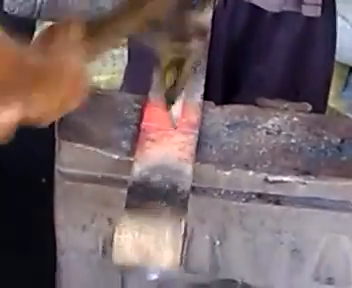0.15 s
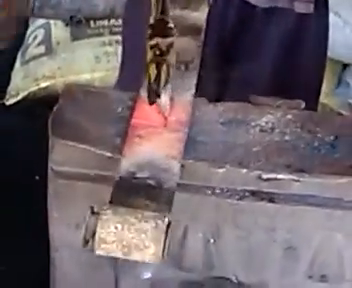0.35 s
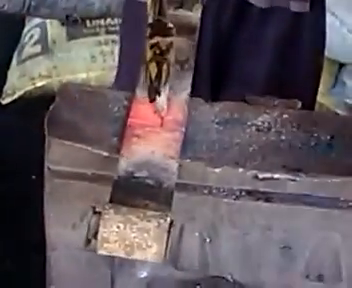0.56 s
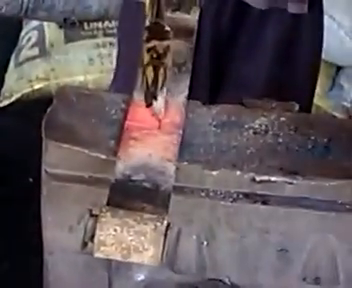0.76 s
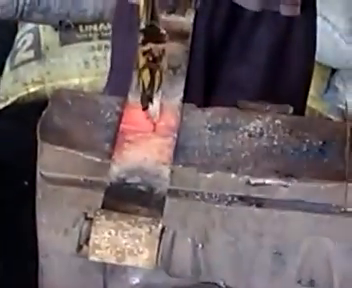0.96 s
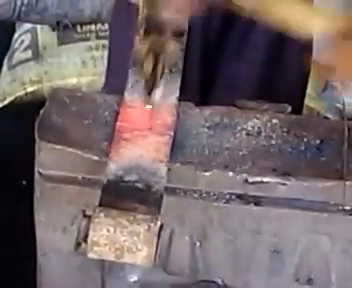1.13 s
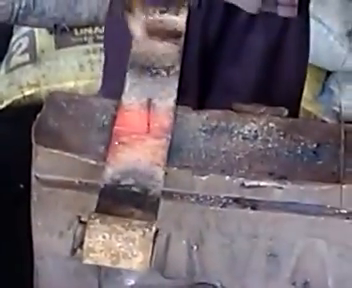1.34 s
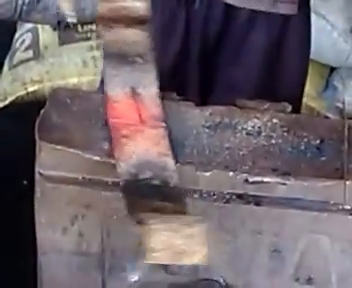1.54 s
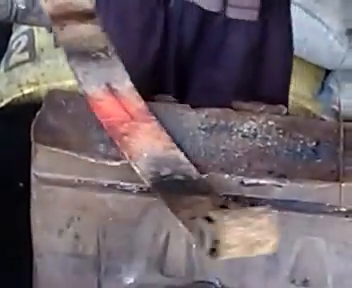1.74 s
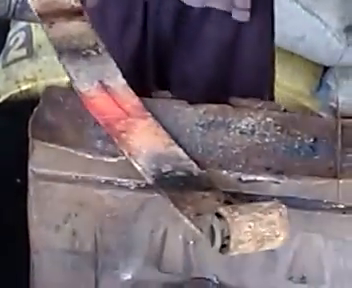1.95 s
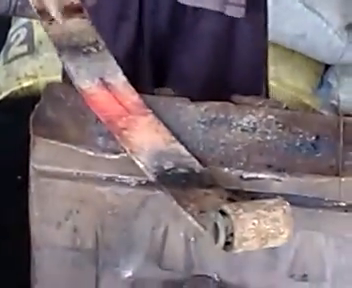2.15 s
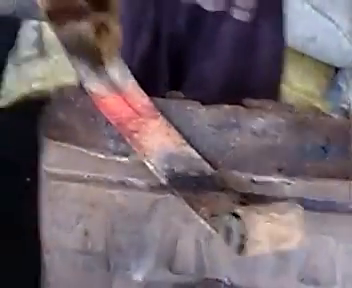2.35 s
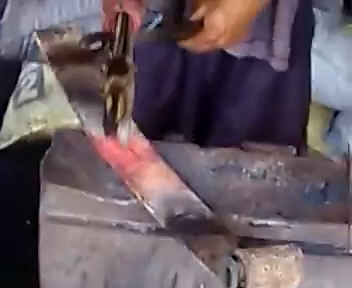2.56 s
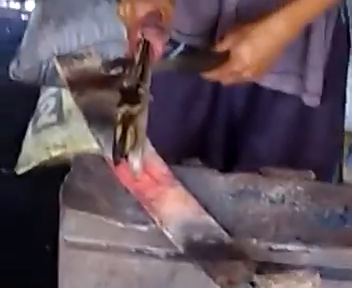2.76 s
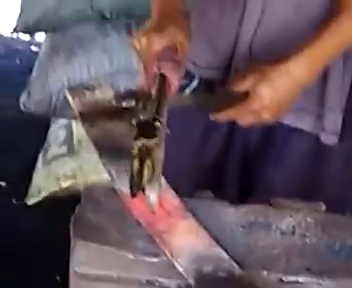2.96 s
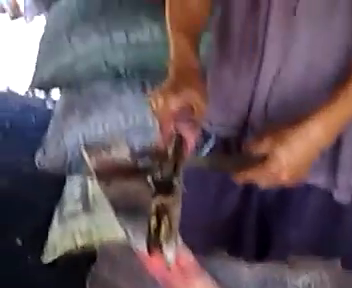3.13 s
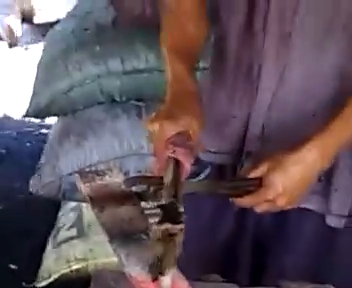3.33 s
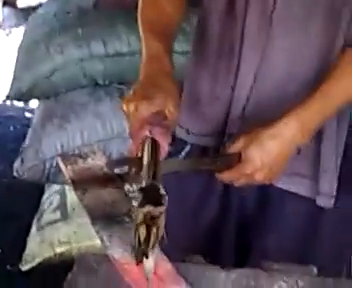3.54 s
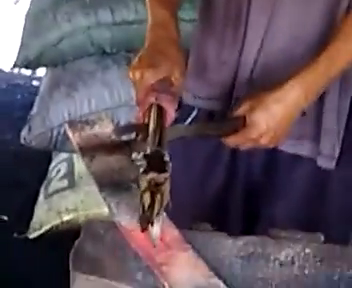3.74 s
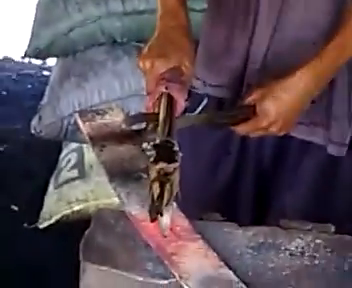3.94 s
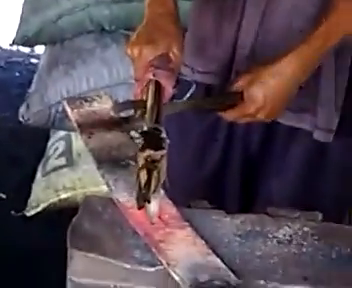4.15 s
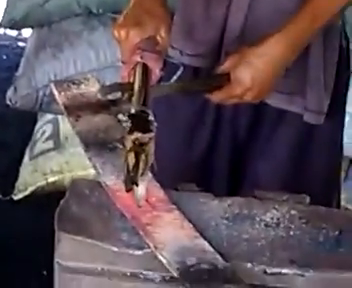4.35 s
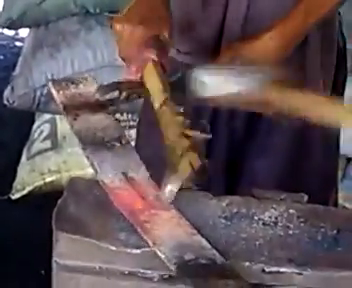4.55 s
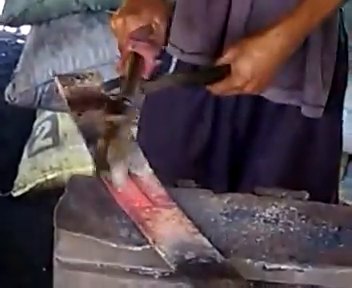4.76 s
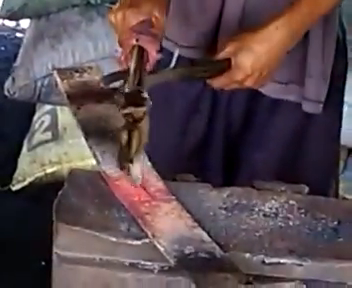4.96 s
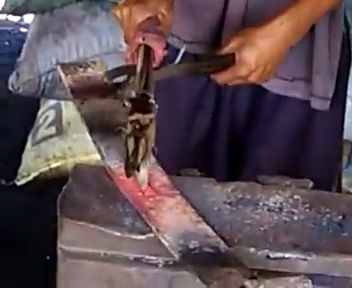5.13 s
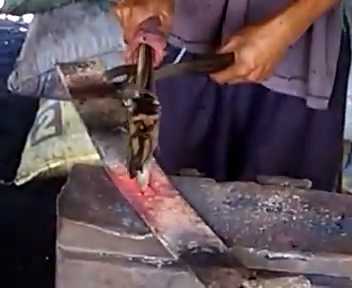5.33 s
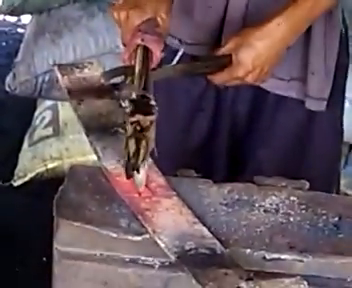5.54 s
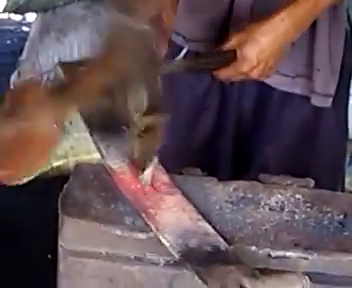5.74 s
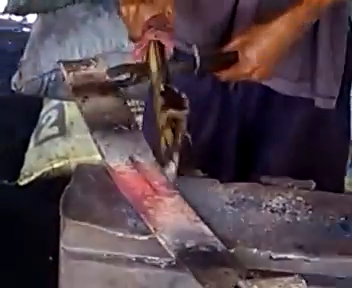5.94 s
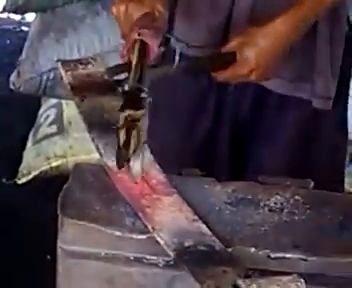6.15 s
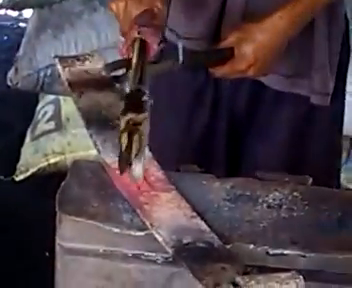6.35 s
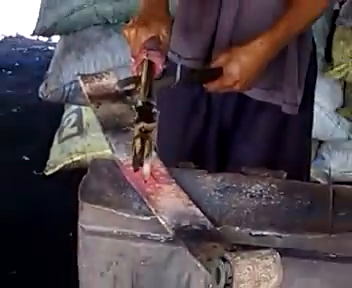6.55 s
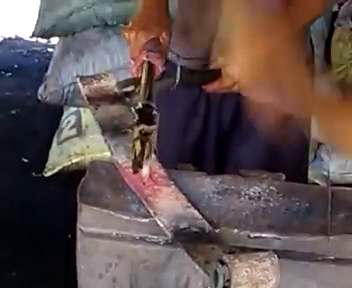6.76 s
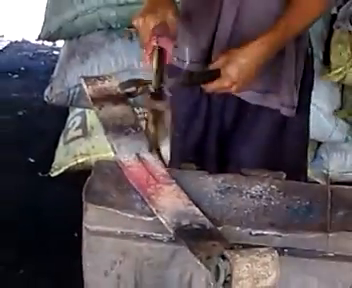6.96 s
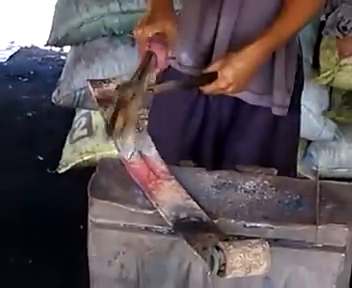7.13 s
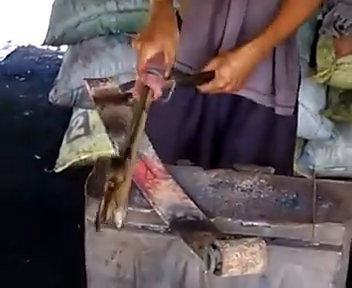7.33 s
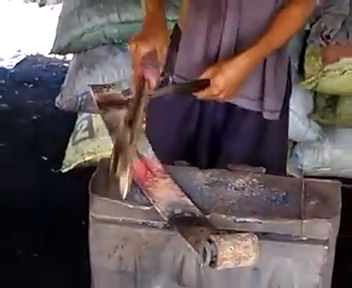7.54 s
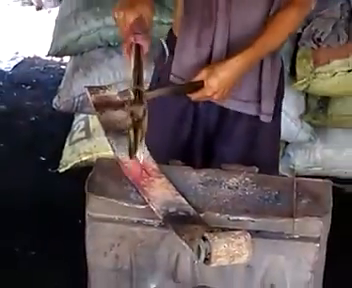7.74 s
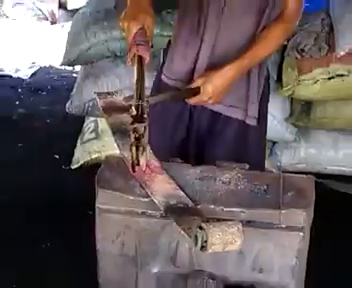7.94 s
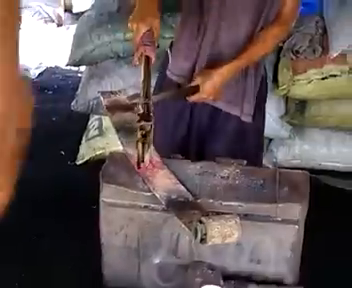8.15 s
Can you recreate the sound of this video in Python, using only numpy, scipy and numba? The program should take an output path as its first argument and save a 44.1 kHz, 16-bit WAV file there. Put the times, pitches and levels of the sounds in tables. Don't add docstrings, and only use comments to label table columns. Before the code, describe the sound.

Sparse hammer strikes clang through a chisel on an anvil, with scrapes and ticks between, over road rumble and engine drone, dull overloaded phone sound.

```python
import sys
import numpy as np
from scipy import signal
from scipy.io import wavfile
from scipy.ndimage import uniform_filter1d
from numba import njit

SR = 44100
rng = np.random.default_rng(int(sys.argv[2]) if len(sys.argv) > 2 else 0)


def to_linear_factor(level_db):
    exponent = np.asarray(level_db, float) / 20
    return 10 ** exponent


def store_pcm(level_fs):
    pcm = np.round(np.clip(level_fs, -1, 1) * 32767).astype(np.int16)
    wavfile.write(sys.argv[1], SR, np.atleast_2d(pcm).T)


N = 365809
T = np.arange(N) / SR


@njit
def svf(x, hz, width):
    y, band, low = np.empty(len(x)), 0., 0.
    g, damping = np.tan(np.pi * hz / SR), width / hz
    for i in range(len(x)):
        v = (band + g * (x[i] - low)) / (1 + g * (g + damping))
        band, low, y[i] = 2 * v - band, low + 2 * g * v, damping * v
    return y


def svf_twice(x, hz, width):
    return svf(svf(x, hz, width), hz, width)


def unit(x):
    return x / np.sqrt(np.mean(x ** 2))


def walk(rate, count=N):
    hold = int(SR / rate)
    steps = np.repeat(rng.standard_normal(count // hold + 1), hold)
    return 1.3 * uniform_filter1d(uniform_filter1d(steps, hold), hold)[:count]


def add(out, s, x):
    i = int(s * SR)
    out[i:i + len(x)] += x[:len(out) - i]


def fade(t, t60):
    return to_linear_factor(-60 * t / t60)


def low_pass(x, hz, order=8):
    return signal.sosfiltfilt(signal.cheby2(order, 45, hz, fs=SR, output="sos"), x)


def road():
    # frequency_hz, density_db (per Hz)
    colour = [(25, -1.5), (105, -9.5), (146, -2), (384, -7.5), (722, -5.5), (2660, -12.5), (3600, -24),
              (4940, -64)]
    # centre_s, half_length_s, level_db
    passes = [
        (.55, .2, 2.5),
        (1.284, 0.28, 2),
        (3.19, 0.44, -1.1),
        (8.2, 0.26, 1.5),
    ]
    steady_db, rumble_db = -44.5, -1
    hz, density_db = np.transpose(colour)
    bands = []
    for centre in 28 * 2 ** np.arange(0, 7.2, 1 / 3):
        band_db = np.interp(np.log(centre), np.log(hz), density_db) + 1.8 * walk(9)
        bands.append(to_linear_factor(band_db) * svf_twice(rng.standard_normal(N), centre, centre / 3))
    low, high = sum(bands[:11]), sum(bands[11:])
    swell_db = sum(db * np.exp(-((T - s) / half) ** 2) for s, half, db in passes)
    return (high + low * to_linear_factor(rumble_db)) / np.std(high) * to_linear_factor(steady_db + 2.5 + swell_db)


def engine(curve, orders, wobble, flutter_db, knee):
    s, hz, db, upper_db = np.transpose(curve)
    phase = 2 * np.pi * np.cumsum(np.interp(T, s, hz) * (1 + wobble * walk(6))) / SR
    throttle_db = np.interp(T, s, upper_db)
    tones = np.zeros(N)
    for k, order_db in orders:
        level_db = order_db + flutter_db * walk(6.4) + throttle_db * (k > knee)
        tones += to_linear_factor(level_db) * np.sin(k * phase)
    fade_in = np.clip((T - s[0] + 0.27) / 0.34, 0, 1)
    fade_out = np.clip((s[-1] + 0.25 - T) / 0.48, 0, 1)
    return np.sqrt(2) * tones * to_linear_factor(np.interp(T, s, db)) * fade_in * fade_out


def leaving_engine():
    # time_s, firing_hz, level_db, upper_multiples_db
    curve = [(0, 49.64, -49.5, -3), (.31, 48.97, -48.5, 2), (.7, 46.95, -46.5, 5.5), (.97, 47.36, -40, -17),
             (1.3, 45.4, -44.5, -3.5), (1.84, 44.8, -51, 2), (2.3, 45.36, -50.5, 1), (3.1, 44.95, -60, 2),
             (4.1, 45.1, -67, -8)]
    # multiple, level_db
    orders = [(1, -10), (2, -1.5), (3, -6), (4, -4.5), (5, -8), (6, -13.5), (7, -6), (8, -13), (9, -14.5),
              (10, -14.5), (11, -11)]
    return engine(curve, orders, wobble=.004, flutter_db=1.3, knee=2.5)


def idling_engine():
    # time_s, firing_hz, level_db, upper_multiples_db
    curve = [(2.2, 29.45, -62, 3), (3.06, 30.02, -54.5, -6.5), (4.03, 31.07, -56.5, 3),
             (5.1, 31.7, -55.5, 0), (6, 32.06, -54, 9.5), (6.6, 32.65, -52, 1), (7.2, 32.8, -49, 1.5),
             (7.88, 32.8, -48.5, 3), (8.29, 33.86, -52, 3)]
    # multiple, level_db
    orders = [(2, -3.5), (3, -7), (4, -4.5), (5, 2), (6, -3.5), (8, -8), (11, -15.5), (12, -11.5)]
    return engine(curve, orders, wobble=.003, flutter_db=1.0, knee=5.5)


def scrape():
    # start_s, length_s, level_db
    drags = [(0.067, .25, -58.5), (0.745, 0.13, -54.5), (1.04, 0.11, -49.5), (1.757, .17, -52.5),
             (5.124, 0.063, -57), (5.311, 0.071, -51.5), (7.405, 0.09, -49.5), (7.504, 0.04, -40.5)]
    rest_db = -52
    attack_s, release_s = 0.017, 0.035
    grains = to_linear_factor(3.6 * walk(120)) * unit(svf_twice(rng.standard_normal(N), 2350., 1500.))
    strength = to_linear_factor(rest_db)
    for s, length, db in drags:
        onset = np.clip((T - s) / attack_s, 0, 1)
        strength = strength + to_linear_factor(db) * onset * np.exp(-np.maximum(T - s - length, 0) / release_s)
    return grains * strength


def ring(t, low_db, high_db):
    # mode_hz, t60_s
    modes = [(2912, 1.02), (3370, .82)]
    out = 0
    for (hz, t60), db in zip(modes, (low_db, high_db)):
        partner = 0.1 * fade(t, 0.32) * np.sin(2 * np.pi * (hz + 9) * t)
        out = out + to_linear_factor(db) * fade(t, t60) * (np.sin(2 * np.pi * hz * t) + partner)
    return out


def ticks():
    # start_s, peak_db, centre_hz, t60_s, ring_db
    contacts = [(.3975, -16.5, 1960, 0.12, -50.5), (1.3144, -21, 2350, 0.029, -45),
                (4.6984, -8, 2300, 0.033, -41), (5.009, -33, 2130, 0.035, -59),
                (5.2877, -22, 2500, 0.016, -55.5), (5.344, -28.5, 2490, 0.025, -57),
                (5.3826, -35, 2600, 0.035, -57.5), (6.027, -20.5, 2540, 0.04, -46.5),
                (6.9933, -9, 2380, 0.031, -56), (7.048, -21.5, 2800, 0.048, -44),
                (7.5058, -19, 1710, 0.026, -41), (8.0637, -29, 2480, 0.036, -55)]
    out, t = np.zeros(N), T[:SR]
    for s, db, hz, t60, ring_db in contacts:
        noise = rng.standard_normal(SR // 5)
        broad = unit(svf(svf(noise, 2300., 1800.), 2800., 1800.))
        knock = unit(svf(noise, 1. * hz, 500.)) + .9 * broad
        add(out, s - .001, to_linear_factor(db - 10.0) * knock * fade(t[:len(noise)], max(t60, .008)))
        add(out, s, ring(t, ring_db, ring_db - 18.0))
    return out


def resonate(x, peaks):
    return unit(sum(to_linear_factor(db) * svf(x, 1. * hz, 1. * width) for hz, width, db in peaks))


def blows():
    # start_s, blow_db, low_ring_db, high_ring_db
    strikes = [
        (0.3314, -6, -29.5, -32.5),
        (1.295, -2.5, -22.5, -22),
        (4.683, -6, -35.5, -43.5),
        (5.9234, -7, -16.5, -36.5),
        (6.9703, -7.5, -35, -30.5),
    ]
    # mode_hz, width_hz, level_db
    bars = [
        [(1411, 130, -6.5), (1790, 110, -5), (2254, 74, -0.5), (2650, 40, -0.5), (3050, 71, 5),
         (3467, 260, -1.5)],
        [(1830, 150, -11), (1990, 53, -3), (2260, 370, -7), (2930, 17, 4.5), (3600, 29.95, -1.5),
         (3830, 18, -5)],
        [(1770, 64, -2), (1993, 46, -1), (2350, 21, -8), (2355, 88, 4.5), (2712, 42, -8.5), (3266, 62, -15.5)],
        [(1530, 9.8, -12), (2120, 47, -5), (2393, 19, 5), (2800, 106, -7.5), (3000, 20, -12), (3624, 210, -4)],
        [(1870, 41, -19), (2260, 32, -2.5), (2380, 82, -6), (2570, 22, 0.5), (2889, 44, 0), (3800, 57, -16)],
    ]
    # mode_hz, width_hz, level_db
    stump = [(168, 140, -10), (254, 11, -9), (452.7, 94, 5), (762, 170, 0.5), (865, 61, -9)]
    snaps = [3, -1, 2.5, 1, -0.5]
    crack_db, crack_hold_s, crack_t60_s = 4.5, 0.0041, 0.013
    rattle_db, rattle_hold_s, rattle_t60_s = -2.5, .012, 0.16
    thud_db, thud_gain_db = -10.5, 2.5
    ahead_s, ahead_db = 0.028, -24.5
    out, t = np.zeros(N), T[:2 * SR]
    short = t[:SR // 2]
    for k, ((s, db, low_db, high_db), bar, snap_db) in enumerate(zip(strikes, bars, snaps)):
        noise = rng.standard_normal((2, len(short)))
        broad = unit(svf_twice(noise[0], 2900.0, 2800.0))
        steel = resonate(noise[0], bar) + to_linear_factor(-4.5) * broad
        rise = 1 - np.exp(-short / 0.00024)

        crack_decay = fade(np.maximum(short - crack_hold_s, 0), crack_t60_s)
        crack = to_linear_factor(crack_db + snap_db) * crack_decay * (0.48 * steel + 0.79 * broad)

        chatter = to_linear_factor(2.4 * walk(400, count=len(short)))
        rattle_decay = fade(np.maximum(short - rattle_hold_s, 0), rattle_t60_s)
        rattle = to_linear_factor(rattle_db) * steel * (rattle_decay * chatter + to_linear_factor(-23.0) * fade(short, 0.22))

        ground = to_linear_factor(-17) * fade(short, 0.22) * np.sin(2 * np.pi * 52 * short)
        thud = to_linear_factor(thud_db + k * thud_gain_db) * (fade(short, 0.13) * resonate(noise[1], stump) + ground)

        add(out, s - .001, to_linear_factor(db - 6.5) * rise * (crack + rattle + thud))
        add(out, s, ring(t, low_db, high_db))
        swell = np.linspace(.3, 1, int(ahead_s * SR))
        ahead = (0.3 * steel + 1.0 * noise[1])[-len(swell):]
        add(out, s - ahead_s, to_linear_factor(db + 3.5 + ahead_db) * swell * ahead)
    return out


def scene():
    background = road() + leaving_engine() + idling_engine()
    return (background + scrape() + ticks() + blows())[None]


def thin(x, follow, size=1024, count=186):
    # frequency_hz, threshold_db
    threshold = [(300, -74.5), (1000, -56.5), (1500, -66), (2000, -55), (2400, -63.5), (3250, -57.5),
                 (3450, -74.5), (4000, -62.5)]
    n, k = np.arange(2 * size), np.arange(count)
    window = np.sin(np.pi * (n + .5) / (2 * size))[:, None]
    basis = window * np.cos(np.pi / size * np.outer(n + .5 + size / 2, k + .5))
    blocks = np.pad(x, (size, 2 * size - len(x) % size)).reshape(-1, size)
    lines = np.hstack([blocks[:-1], blocks[1:]]) @ basis * 2 / size
    loud_db = 10 * np.log10(np.sum(lines ** 2, axis=1))
    excess_db = (loud_db - np.median(loud_db))[:, None]
    hz, db = np.transpose(threshold)
    line_hz = (k + .5) * SR / 2 / size
    floor = to_linear_factor(np.interp(np.log(line_hz), np.log(hz), db) + follow * excess_db)
    frames = (lines * (np.abs(lines) > floor)) @ basis.T
    return (frames[1:, :size] + frames[:-1, size:]).ravel()[:len(x)]


def dropout(x):
    lost_s, back_s, fade_s, lost_db, hum_db = 1.258, 1.278, 0.011, -54, -8.5
    lost = np.clip((T - lost_s) / fade_s + .5, 0, 1) ** 2 * np.clip((back_s - T) / 0.0019, 0, 1)
    return x * to_linear_factor(lost_db * lost) + lost * to_linear_factor(hum_db) * svf_twice(x, 330., 150.)


def top_cut(x):
    return signal.sosfilt(signal.butter(12, 16650, fs=SR, output="sos"), x)


def record(dry):
    mic_clip, output_clip = .78, .73
    phone_rate_hz, top_hz = 8000, 4439
    mirror_db, mirror_top_hz = -19, 4720
    x = low_pass(np.clip(dry[0], -mic_clip, mic_clip), top_hz)
    x = dropout(thin(x, follow=0.28))
    mirror = low_pass(x * np.cos(2 * np.pi * phone_rate_hz * T), mirror_top_hz, order=20)
    mix = np.clip(x + to_linear_factor(mirror_db) * mirror, -output_clip, output_clip)[None]
    return top_cut(mix)


dry = scene()
out = record(dry)
store_pcm(out)
```